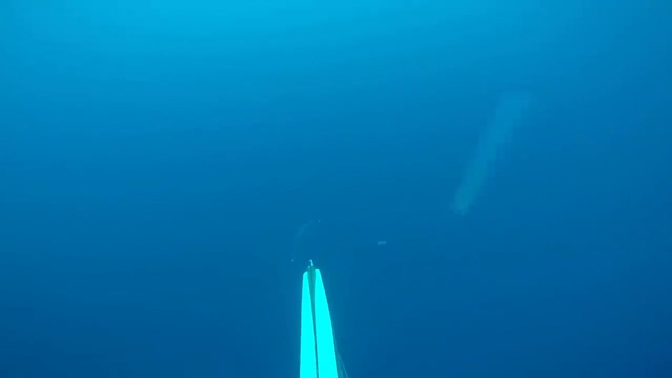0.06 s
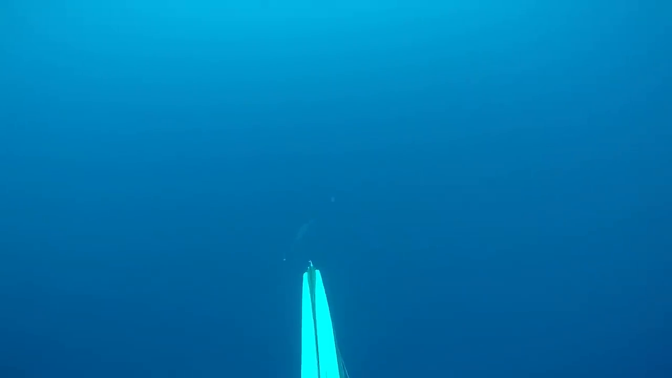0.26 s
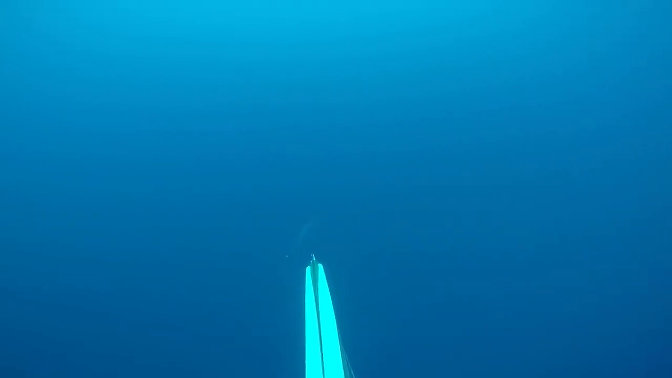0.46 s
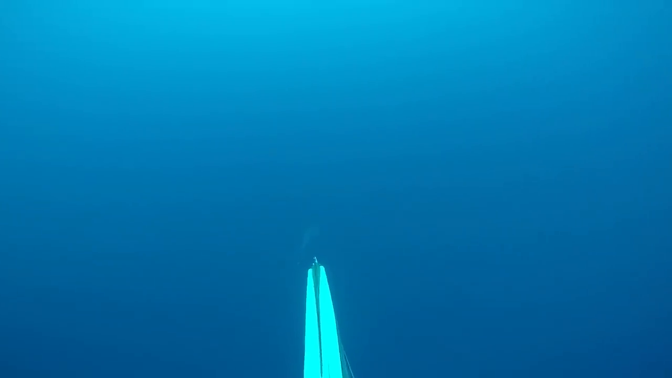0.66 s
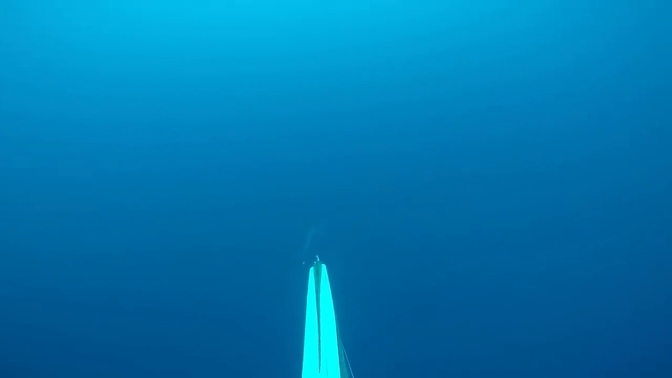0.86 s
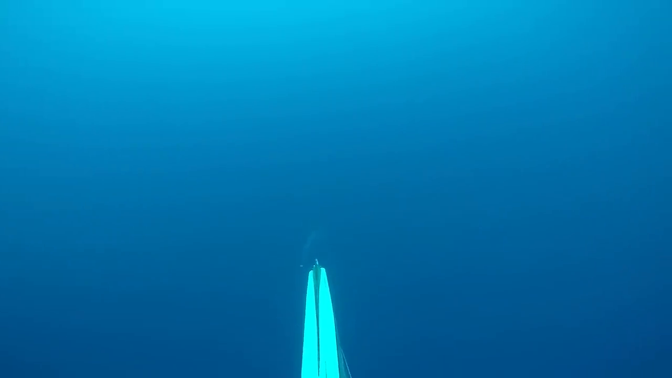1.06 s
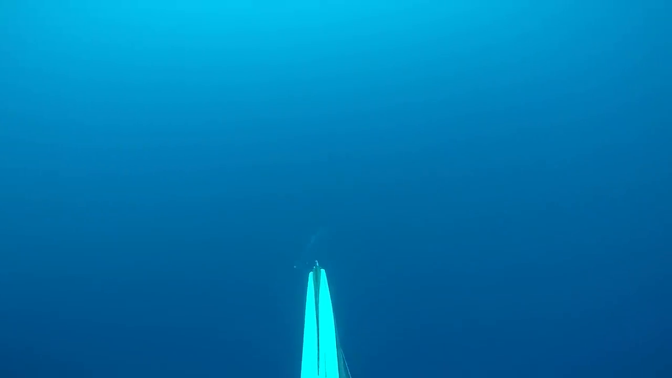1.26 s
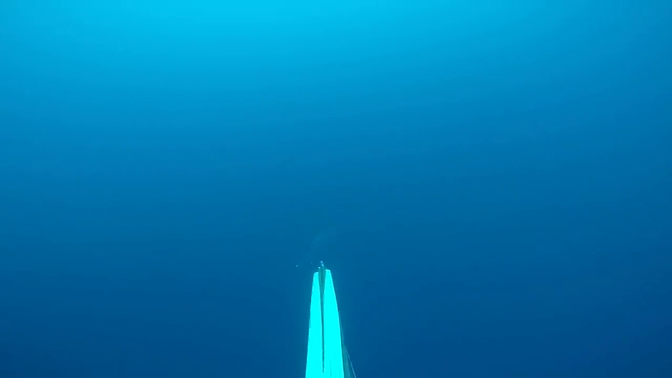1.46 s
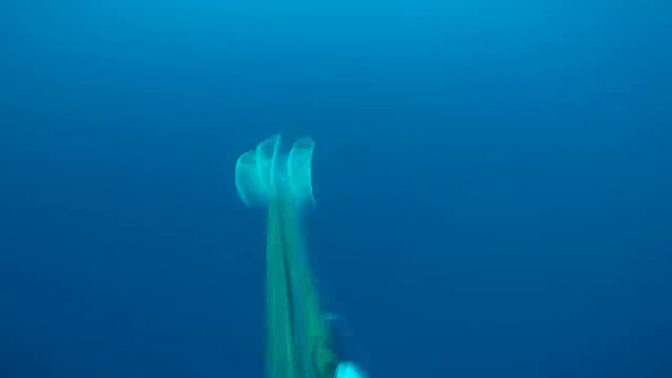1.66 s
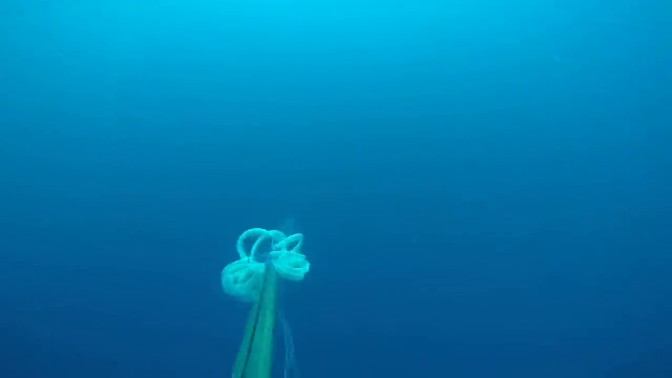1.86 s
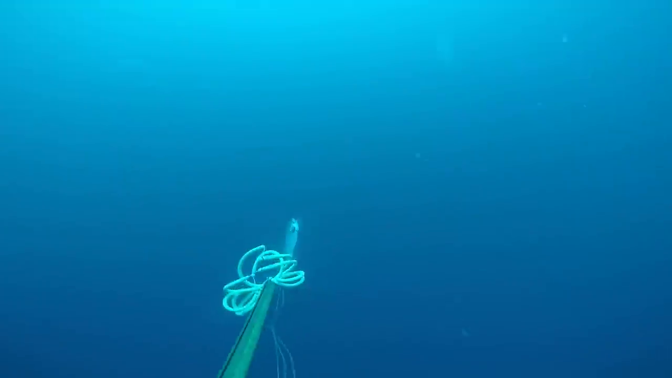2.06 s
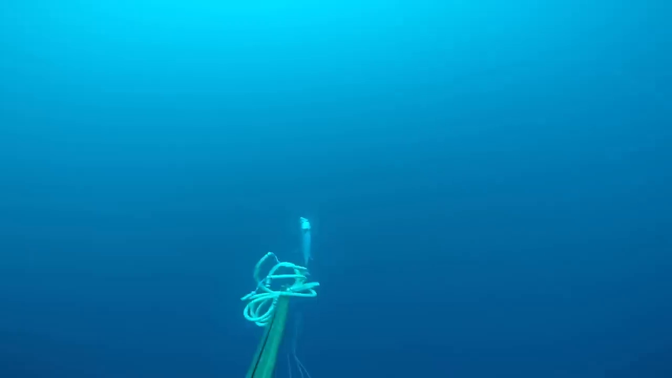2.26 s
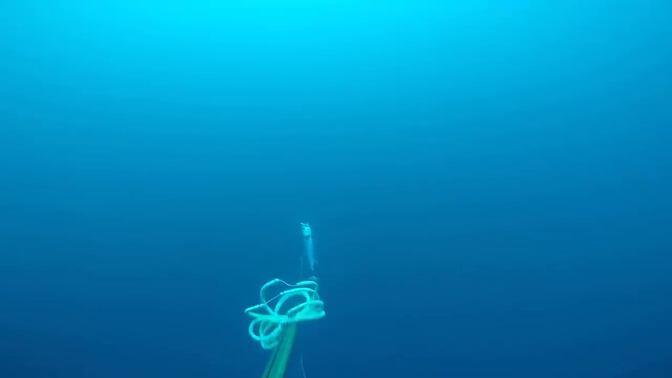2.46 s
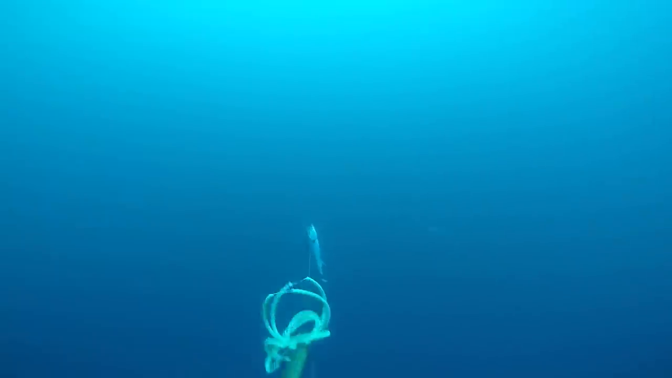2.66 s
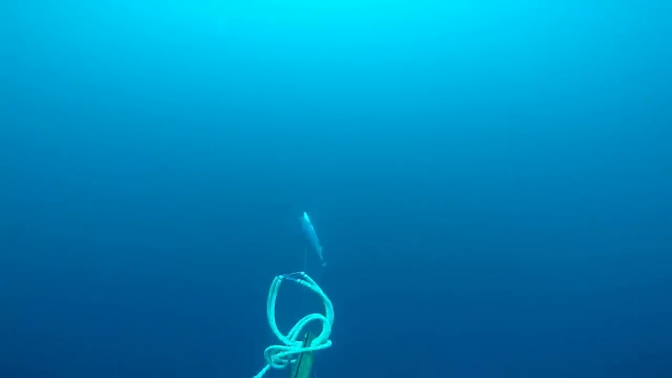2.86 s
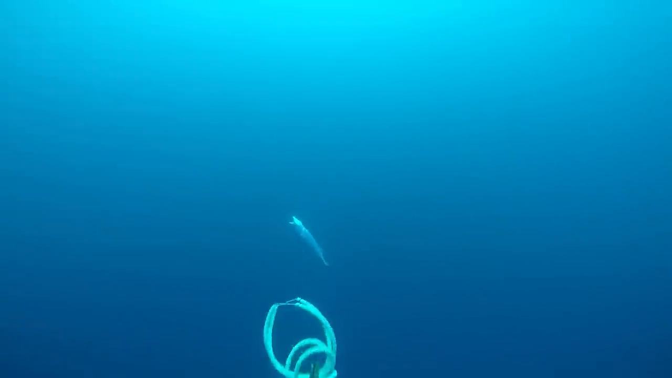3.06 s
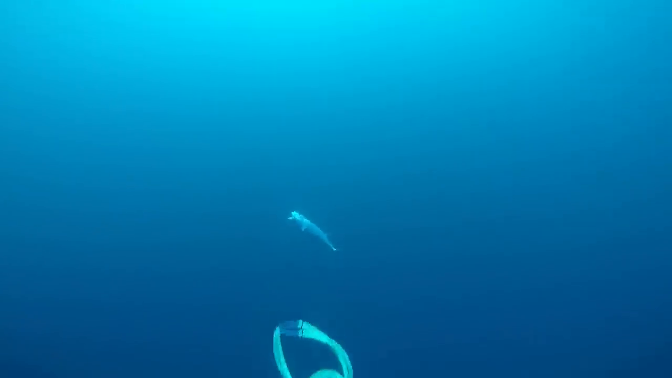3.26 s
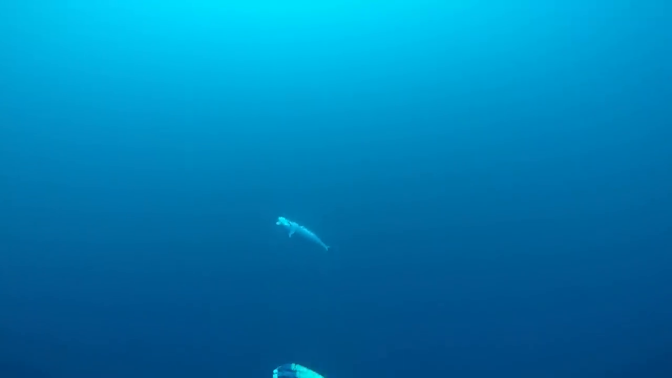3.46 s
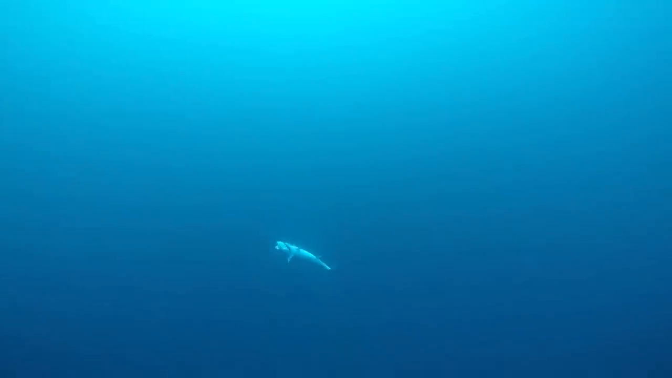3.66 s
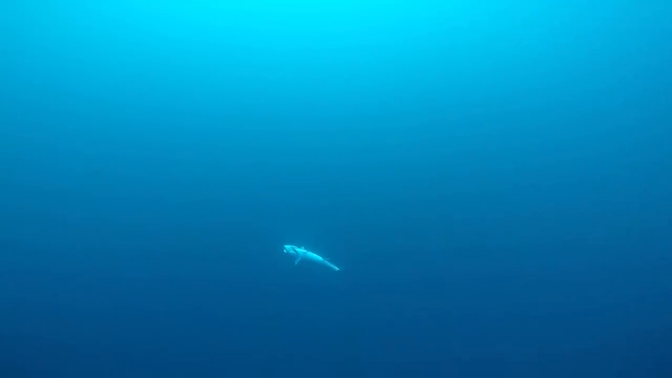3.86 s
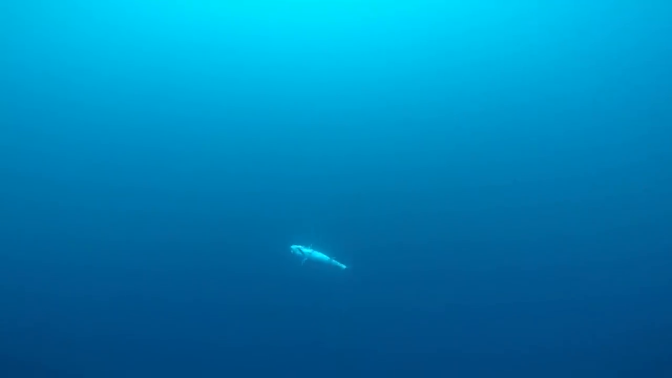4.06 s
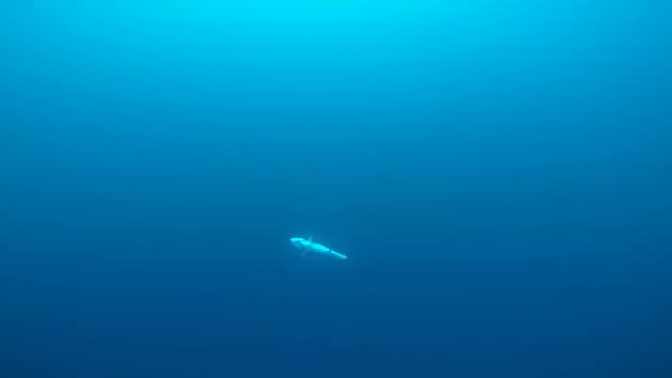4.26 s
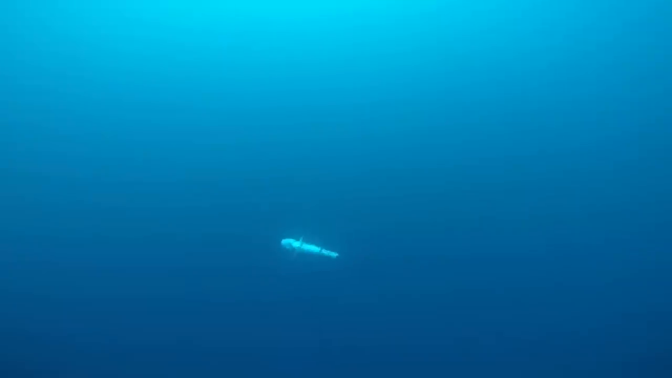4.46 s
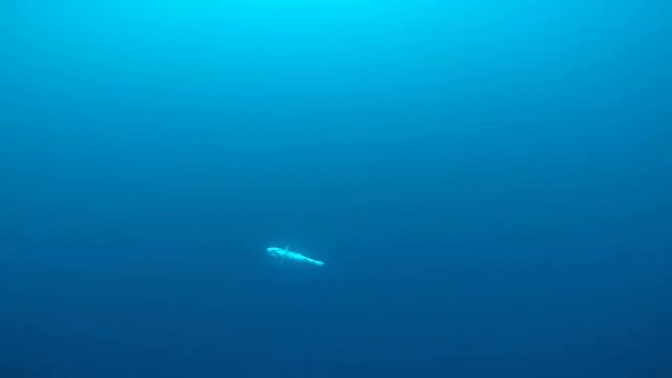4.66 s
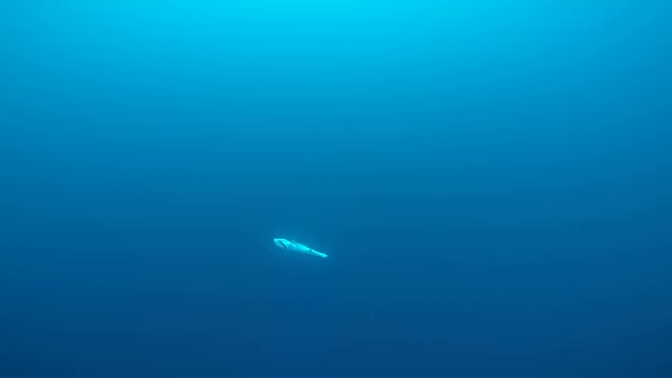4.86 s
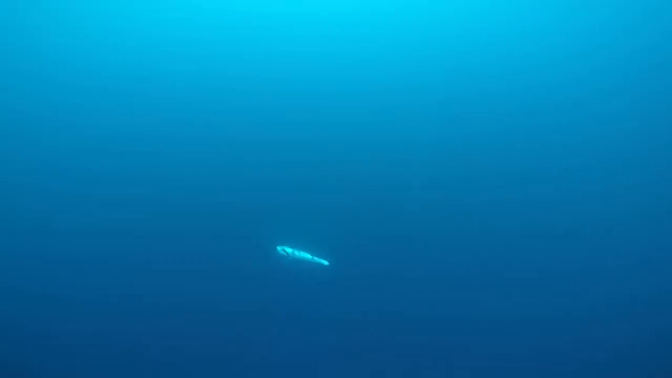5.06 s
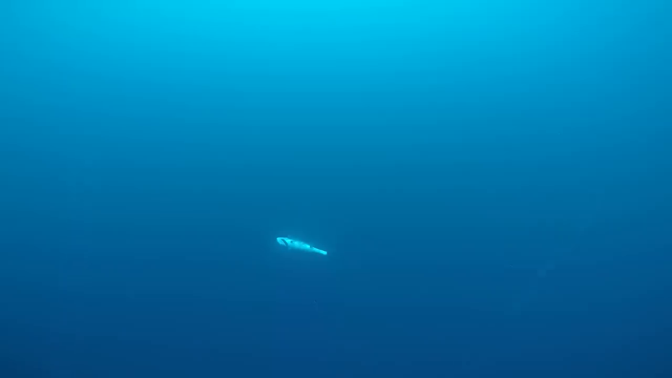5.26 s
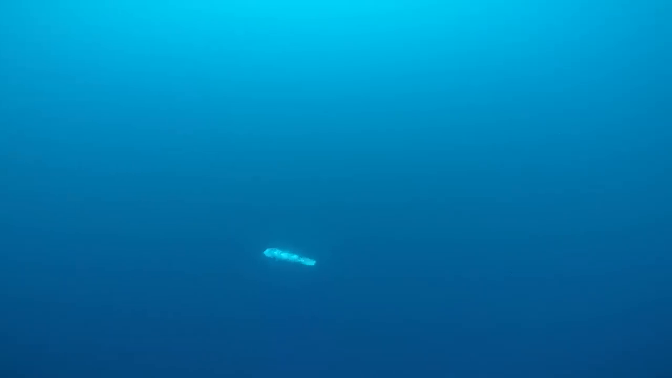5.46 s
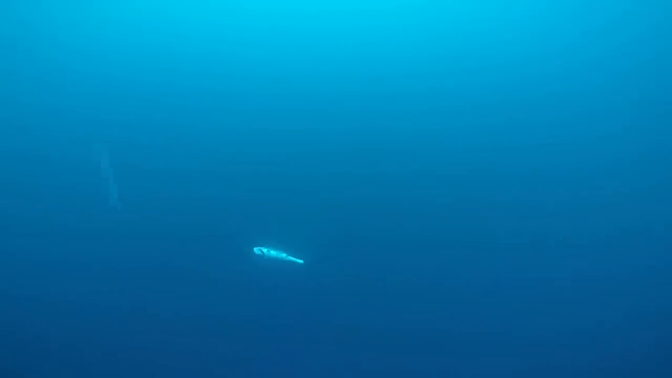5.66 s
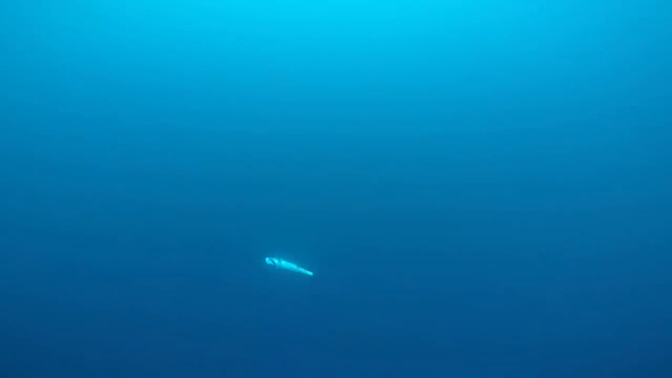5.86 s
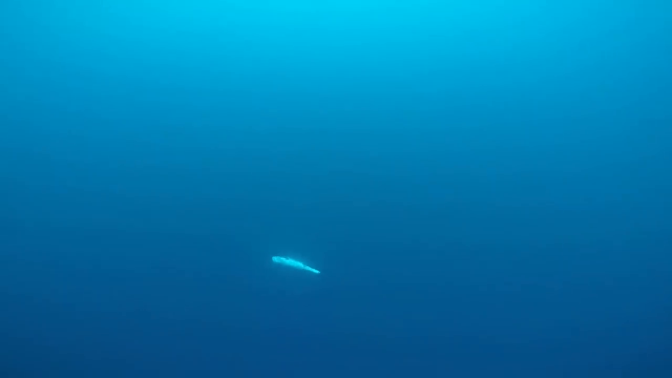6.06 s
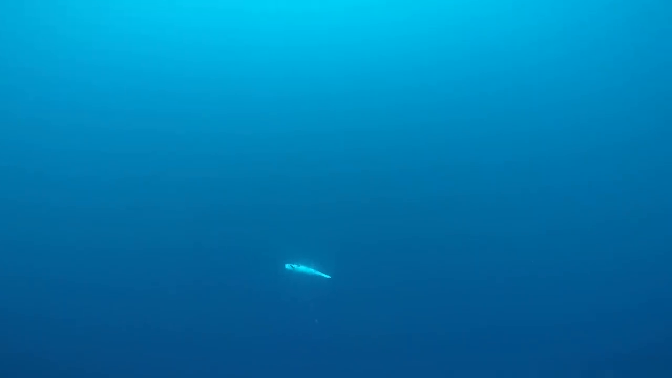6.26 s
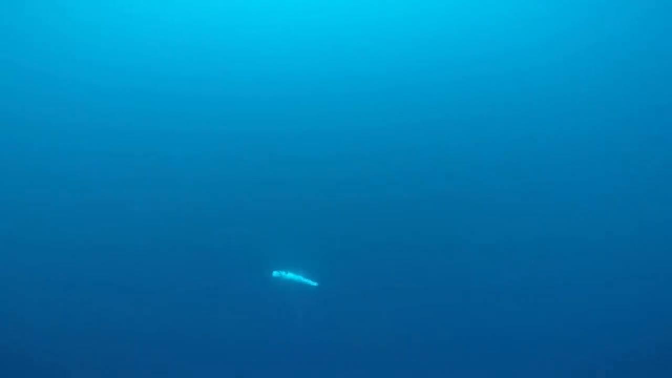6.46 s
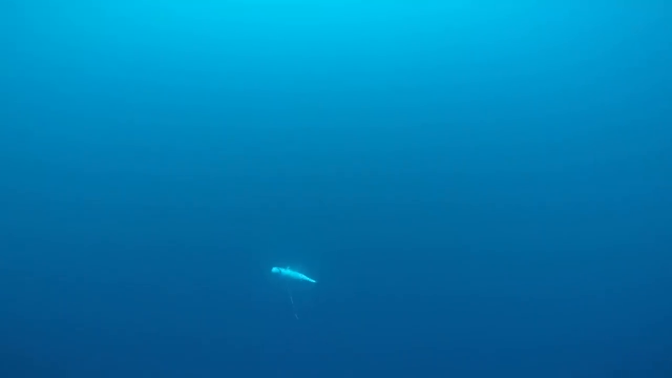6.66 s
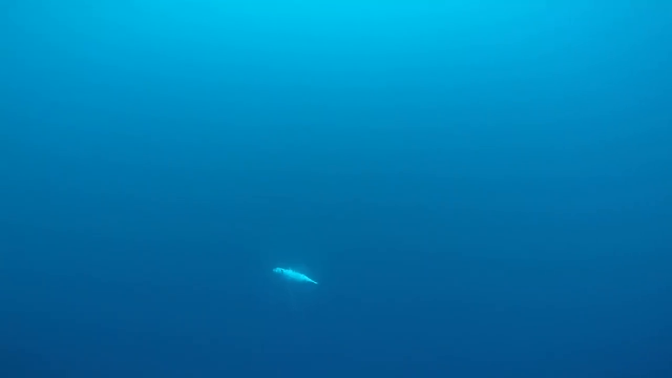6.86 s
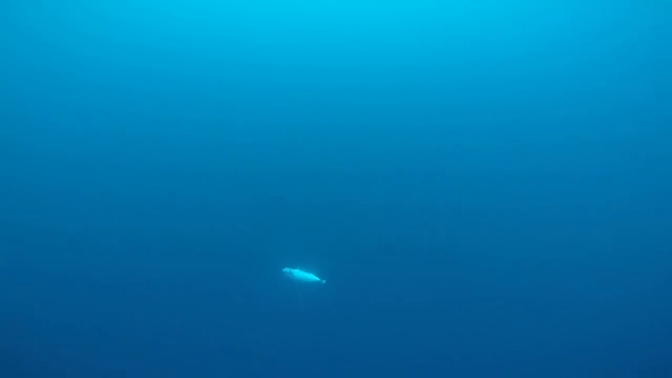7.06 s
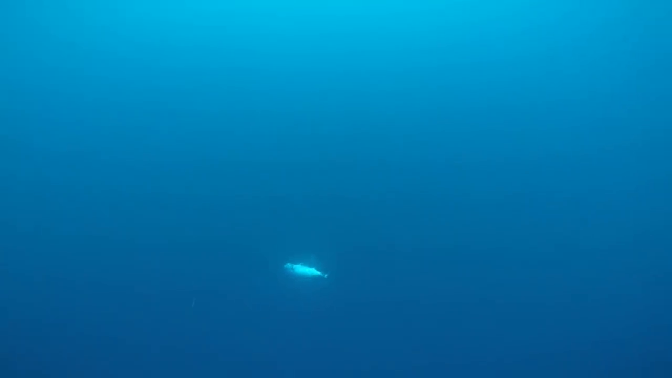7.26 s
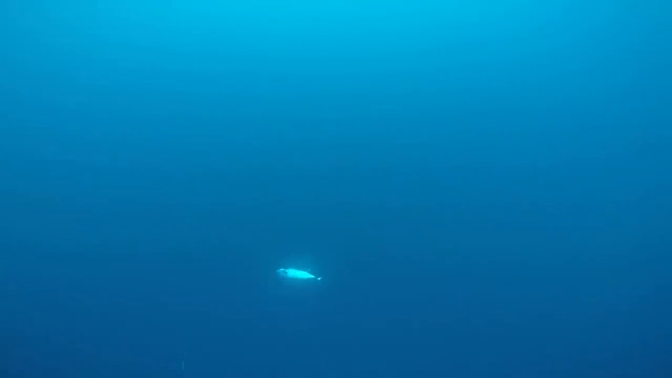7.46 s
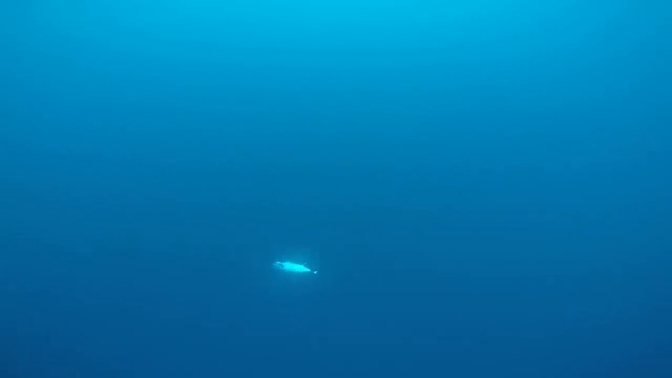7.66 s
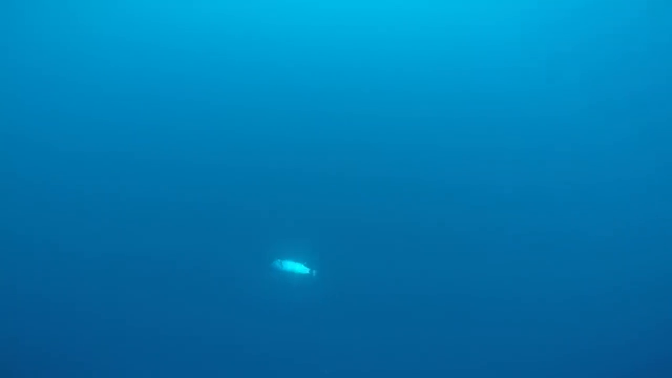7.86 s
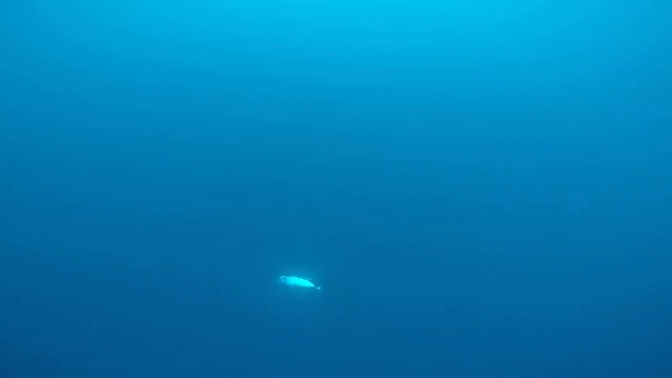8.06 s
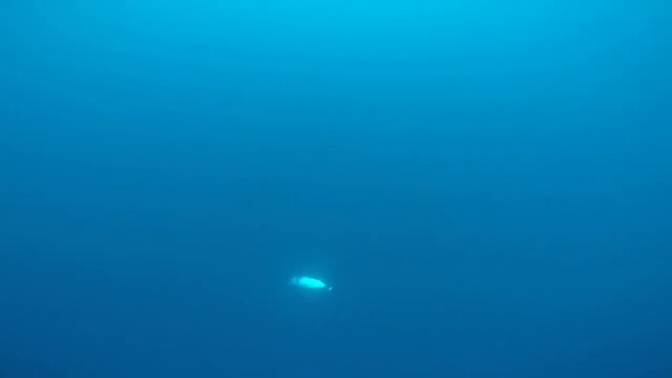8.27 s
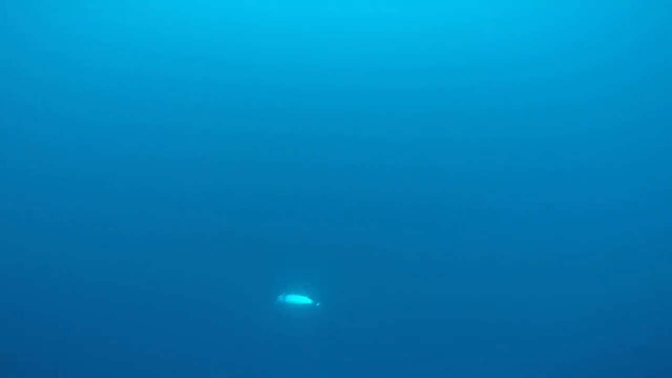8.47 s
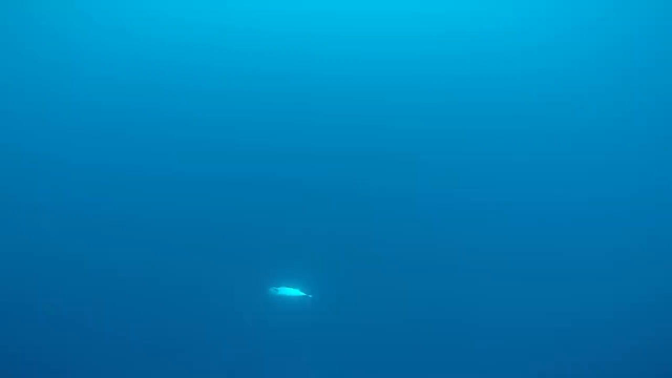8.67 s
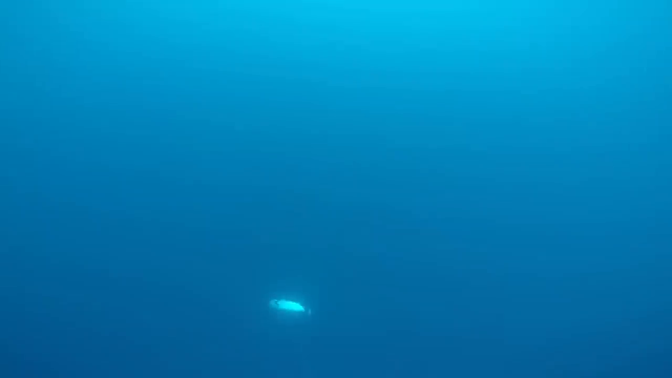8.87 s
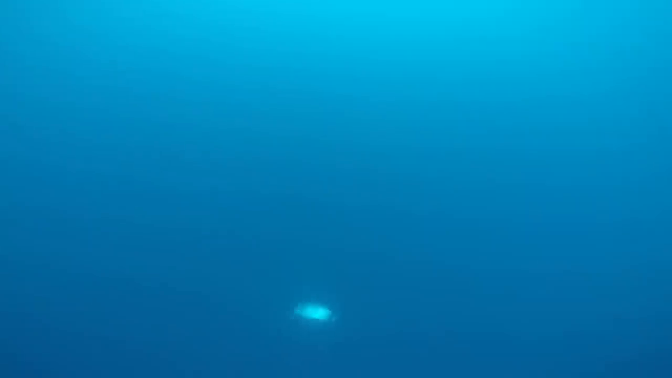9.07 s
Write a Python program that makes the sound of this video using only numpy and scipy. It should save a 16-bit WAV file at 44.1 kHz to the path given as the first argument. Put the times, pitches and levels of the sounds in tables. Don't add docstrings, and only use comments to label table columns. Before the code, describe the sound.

Open water heard through a small enclosed microphone: muffled, boxy, with fine distant shrimp crackle. Rubber and line bump the barrel before a single very loud speargun shot, all crack, clatter and low thump. Sound drops away for a moment and recovers. Afterwards come hollow knocks, bright single clicks, a scraping rub with thin rubber squeaks, throbbing low swells and a last cluster of knocks near the end.

```python
import sys
import numpy as np
from scipy import signal
from scipy.fft import rfft, irfft
from scipy.io import wavfile
from scipy.ndimage import uniform_filter1d

SR = 44100
rng = np.random.default_rng(int(sys.argv[2]) if len(sys.argv) > 2 else 0)


def generate_wav(sig):
    pcm = np.round(np.clip(np.atleast_2d(sig).T, -1, 1) * 32767).astype(np.int16)
    wavfile.write(sys.argv[1], SR, pcm)


def invert_db(level):
    return 10 ** (np.asarray(level, dtype=float) / 20)


N = 402191
TIME = np.arange(N) / SR
SLOW = TIME[::64]


def unit(x):
    return x / np.sqrt(np.mean(x ** 2))


def noise():
    return rng.standard_normal(N)


def band(x, hz, width):
    return signal.lfilter(*signal.iirpeak(hz, hz / width, fs=SR), x)


def steep(x, peaks):
    out = 0
    for k, (hz, width, db) in enumerate(peaks):
        once = band(x, hz, 1.44 * width)
        out = out + (-1) ** k * invert_db(db) * band(once, hz, 1.44 * width)
    return out


def low_pass(x, hz):
    return signal.sosfilt(signal.butter(6, hz, fs=SR, output="sos"), x)


def colour(x, points):
    hz, db = np.transpose(points)
    bins = np.maximum(np.fft.rfftfreq(N, 1 / SR), 1)
    return irfft(rfft(x) * invert_db(np.interp(np.log(bins), np.log(hz), db)), N)


def walk(rate):
    k = int(SR / rate)
    steps = np.repeat(rng.standard_normal(N // k + 1), k)
    return unit(uniform_filter1d(uniform_filter1d(steps, k), k)[:N])


def clicks(rate, spread_db, most=8.1):
    u = rng.random((3, N))
    size_db = spread_db * np.minimum(-np.log(1 - u[2]), most)
    return (u[0] < rate / SR) * np.sign(u[1] - .5) * invert_db(size_db)


def add(out, s, x):
    i = int(s * SR)
    out[i:i + len(x)] += x[:N - i]


def fade(since_s, fade_s):
    return np.exp(-np.maximum(since_s, 0) / fade_s)


def gain_db():
    before_db, duck_db, duck_at_s, fall_s = -2, -17, 1.596, 0.035
    duck_ends_s, climb_db_per_s = 2.004, 19
    fall = before_db + (duck_db - before_db) * (1 - fade(TIME - duck_at_s, fall_s))
    return np.minimum(fall + climb_db_per_s * np.maximum(TIME - duck_ends_s, 0), 0)


def crackle(rate):
    snap = clicks(rate, spread_db=8.0, most=2.8)
    tail = signal.lfilter([1], [1, -np.exp(-1 / (0.0016 * SR))], np.abs(snap))
    return unit(snap + 0.088 * tail * noise())


# pitch_hz, width_hz, level_db
CASE_WALLS = [(800, 260, -17), (1750, 315, -11.5), (2150, 218, -2.5), (2475, 362, -0.5), (3214, 215, -6),
              (3584, 223, 3.5), (4206, 350, -3.5), (5294, 650, -3.5), (6940, 1040, -9), (8165, 620, -7.5),
              (9970, 1300, -9.5), (12030, 1400, -19), (14500, 2160, -13.5)]
# pitch_hz, level_db
WATER_HISS = [(300, -3), (1400, -30.5), (2000, 20.5), (4000, 0.5), (9000, -13), (15800, -12.5)]


def reef(drag):
    level_db, treble_db, treble_duck_share, drag_db = -43, -5, 0.12, -17
    gain = gain_db()
    flurry = invert_db(2.0 * walk(20))
    both, dull, bright = (crackle(rate) for rate in (700, 600, 1200))
    far = .5 * noise() * invert_db(0.18 * walk(27))
    low_snaps = flurry * (0.6 * both + .5 * dull)
    low = unit(steep(low_snaps + far, CASE_WALLS[:8])) + invert_db(-20.5) * unit(colour(far, WATER_HISS))
    high_snaps = flurry ** 0.43 * (0.47 * both + 0.56 * bright)
    high = unit(steep(high_snaps + far, CASE_WALLS[8:]))
    treble = invert_db(treble_db + treble_duck_share * gain) * high
    return invert_db(level_db + gain) * (low + treble) + invert_db(drag_db) * drag * low


# start_s, level_db
CASE_JOLTS = [(.128, -46), (.356, -41), (.49, -57), (.876, -47), (1.554, -36), (1.76, -40), (3.049, -39.5),
              (3.19, -41), (3.361, -36), (3.69, -42), (3.85, -32.5), (4.06, -33), (4.3, -32.5),
              (4.869, -27), (5.02, -55), (5.35, -32), (5.5, -52), (5.8, -25), (5.97, -38), (6.23, -36.5),
              (6.5, -35.5), (6.8, -26), (7.01, -41.5), (7.45, -48), (7.83, -30.5), (8.3, -32.5), (8.6, -52),
              (8.83, -27.5), (9.1, -33)]
# start_s, half_length_s, level_db
EDDY_WAKES = [(.0, 0.07, -57), (0.59, .15, -48.5), (1.762, 0.078, -40), (3.03, 0.05, -56),
              (3.541, 0.11, -54), (4.02, 0.22, -51), (4.65, 0.07, -77.5), (5.2, 0.28, -57),
              (5.8, 0.43, -56), (7.94, 0.061, -46.5), (8.803, 0.25, -57)]


def surge():
    sway_db, rumble_db, duck_share = -40, -49.5, 0.61
    rise_db_per_s, fall_db_per_s = 129, 191
    sink_db = -5.5 * np.exp(-((TIME - 2.75) / .25) ** 2)
    duck_db = duck_share * gain_db() + sink_db
    jolts, wakes = 0, 0
    for s, db in CASE_JOLTS:
        drop_db = np.where(SLOW < s, rise_db_per_s * (s - SLOW), fall_db_per_s * (SLOW - s))
        jolts = jolts + invert_db(db - drop_db)
    for s, half, db in EDDY_WAKES:
        wakes = wakes + invert_db(db) * np.exp(-((SLOW - s) / half) ** 2)
    swing = invert_db(sway_db + duck_db) + np.interp(TIME, SLOW, jolts)
    flow = invert_db(rumble_db + duck_db + 1.4 * walk(6.8)) + np.interp(TIME, SLOW, wakes)
    sway = unit(band(band(noise(), 28.6, 19), 24.5, 30))
    throb = unit(sway / (np.sqrt(uniform_filter1d(sway ** 2, SR // 25) + 1e-3) + 1.6))
    rumble = unit(band(band(noise(), 70, 46.0), 97.0, 150) * invert_db(1.47 * walk(25)))
    eddies = unit(band(noise(), 183, 130) * invert_db(2.5 * walk(25)))
    return throb * swing + flow * (rumble + invert_db(-7.5) * eddies)


# start_s, length_s, low_ring_db, high_ring_db
RUB_STROKES = [(-.1, 0.16, -50, -72), (0.468, 0.086, -37, -43), (0.502, .2, -43, -52),
               (1.656, 0.078, -52.5, -46.5), (2.1, 0.7, -59, -67.5), (2.805, 0.28, -55, -77),
               (3.409, 1, -58, -88), (4.9, 0.18, -58, -83), (5.202, 0.32, -40.5, -77),
               (5.213, 0.72, -36.5, -38), (5.797, 0.34, -56, -75), (5.986, 0.33, -53, -53.5),
               (7.007, 0.25, -53, -80), (7.795, 0.24, -65, -68), (8.46, 0.21, -53, -60),
               (8.659, 0.13, -45.5, -51.5), (8.805, 0.14, -40, -38), (8.866, 0.17, -48, -48.5),
               (9.0, 0.18, -66, -65)]


def sliding():
    low_by_speed, high_by_speed = 0.59, 1.3
    creep_low_db, creep_high_db = -72.5, -65
    duck_db, low, high = 0.64 * gain_db(), 0, 0
    for s, length, low_db, high_db in RUB_STROKES:
        arch = np.abs(np.sin(np.pi * np.clip((SLOW - s) / length, 0, 1)))
        speed = arch * (SLOW < s + length)
        low = low + invert_db(low_db) * speed ** low_by_speed
        high = high + invert_db(high_db) * speed ** high_by_speed
    creep_low = invert_db(creep_low_db + duck_db + 1.5 * walk(4))
    creep_high = invert_db(creep_high_db + duck_db + 1.5 * walk(1.6))
    return np.interp(TIME, SLOW, low) + creep_low, np.interp(TIME, SLOW, high) + creep_high


# pitch_hz, width_hz, level_db
RUBBED_LOW = [(205, 60, -9), (268, 50, 0), (385, 100, -13), (560, 200, -20)]
# pitch_hz, width_hz, level_db
RUBBED_HIGH = [(770, 70, 0), (900, 90, -11), (1130, 280, -12)]


def slip_grains():
    return unit(clicks(700, spread_db=2.0)) * invert_db(2.6 * walk(50)) + .7 * noise()


def rub(low, high):
    slow, fast = slip_grains(), slip_grains()
    low_rub = unit(steep(slow, RUBBED_LOW)) * low
    return low_rub + unit(steep(fast + 0.19 * slow, RUBBED_HIGH)) * high


def taut_bands():
    hz = 840 * (1 + .035 * walk(5) + .02 * walk(60))
    hum = np.sin(2 * np.pi * np.cumsum(hz) / SR)
    return hum * invert_db(-60 + 4.5 * walk(7)) * (TIME < 1.6)


# start_s, pitch_hz, peak_db, t60_s
BLOW_RINGS = [(.461, 800, -19.5, 0.096), (.462, 435, -26, .06), (.474, 668, -14, 0.048),
              (.473, 368, -16, 0.052), (.482, 292, -23, 0.053), (.49, 256, -26.5, 0.24),
              (.497, 800, -39, .1), (1.68, 95, -26, .15), (1.6245, 302, -1, 0.035), (1.625, 470, -8, .04),
              (1.675, 800, -44, 0.13), (1.672, 233.7, -19.5, 0.068), (1.712, 190, -18.5, 0.044),
              (1.7955, 135, -23, .14), (1.8172, 133, -25, .1), (1.6243, 190, -8, .07),
              (1.776, 100, -30, .1), (1.79, 270, -29, .06), (1.82, 285, -32.5, 0.062),
              (3.441, 252, -23, 0.054), (3.447, 700, -35, 0.066), (3.6185, 81.5, -13.5, .13),
              (3.625, 150, -22, 0.11), (3.62, 319, -15, 0.08), (3.62, 423, -17, .07), (3.62, 715, -26, .06),
              (3.62, 960, -23, .07), (3.97, 255, -8, 0.11), (3.969, 139.4, -21, 0.35),
              (3.972, 386, -17, 0.09), (3.995, 401, -26, 0.11), (3.973, 530, -16.5, 0.11),
              (3.974, 723, -14, 0.092), (3.971, 905, -25, .07), (3.99, 640, -21, 0.095),
              (4.013, 218.4, -14.5, .14), (4.015, 515, -26, .1), (8.936, 433, -9, 0.091),
              (8.936, 717, -12.5, 0.077), (8.937, 293, -15, 0.16), (8.945, 205, -12.5, 0.17),
              (8.94, 95.5, -24, 0.24), (8.358, 150, -22.5, 0.045), (8.936, 549, -18, 0.074),
              (8.937, 870, -27, .05), (8.95, 402, -21, 0.065), (8.964, 420, -23.5, 0.087),
              (8.977, 226, -23, .08)]
# start_s, pitch_hz, peak_db, t60_s
LIGHT_TAP_RINGS = [(.044, 403, -37, .04), (.055, 730, -37.5, 0.034), (.11, 800, -25.5, 0.037),
                   (.61, 834, -32.5, 0.047), (2.857, 850, -42.5, .05), (2.897, 270, -39, .05),
                   (2.972, 430, -33, 0.058), (2.985, 674, -34, 0.041), (3.012, 500, -33, 0.046),
                   (3.124, 500, -45, 0.03), (3.268, 900, -41, 0.052), (3.505, 395, -30, .05),
                   (3.508, 695, -36, 0.056), (3.508, 1290, -41, .04), (4.628, 305, -26, .04),
                   (4.632, 664, -25, 0.047), (4.647, 390, -36, 0.047), (4.772, 433, -29, .08),
                   (4.78, 400, -28, 0.035), (4.779, 814, -34, .05), (4.817, 775, -37, .04),
                   (4.845, 850, -38, .04), (4.866, 600, -37, 0.033), (4.976, 420, -43, .09),
                   (5.0, 445, -40, .07), (5.014, 424, -37, 0.092), (5.033, 750, -40, .04),
                   (5.114, 280, -29, .04), (5.118, 715, -30.5, 0.042), (6.065, 780, -30.5, 0.057),
                   (6.09, 760, -37, .06), (6.115, 800, -35, 0.05), (6.14, 754, -38, 0.05),
                   (6.19, 750, -47, .08), (8.71, 300, -38, .1), (8.925, 1200, -41, 0.036),
                   (8.995, 1100, -39, .04),
                   (1.565, 420, -42, .04), (1.565, 720, -44, .04), (2.14, 990, -44, .06),
               (3.268, 1100, -44, .06), (3.32, 450, -43, .05), (3.842, 290, -35, .08), (3.9, 270, -39, .06),
               (3.945, 330, -37, .06), (3.945, 720, -41, .05), (5.985, 770, -41, .05),
               (6.015, 760, -43, .05), (6.038, 790, -37, .06), (6.235, 1600, -44, .04),
               (7.051, 400, -42, .05), (7.104, 215, -36, .1), (7.274, 780, -43, .05),
               (7.312, 385, -39, .06), (7.314, 760, -45, .04), (8.186, 786, -28, .05), (8.19, 215, -31, .2),
               (8.31, 400, -37, .06), (8.358, 420, -33, .05), (8.83, 1150, -38, .05)]
# start_s, pitch_hz, peak_db, t60_s
SHAFT_RINGS = [(1.6475, 673, -11, .3), (1.6475, 781, -8, .3), (1.6465, 870, -17, .15),
               (1.6445, 2400, -17, .12), (1.6445, 2331, -12.5, .2), (1.6445, 2492, -10.5, 0.22),
               (1.6445, 3190, -20, 0.089), (1.635, 3575, -18, .15), (1.649, 3610, -12, 0.087),
               (1.65, 4390, -17, 0.076), (1.647, 485, -18, 0.11)]


def ring_out(rows):
    attack_s, sag, sag_s = 0.0015, 0.032, .015
    out, t = np.zeros(N), np.arange(SR // 3) / SR
    for s, hz, db, t60 in rows:
        turns = hz * (t + sag * (hz < 500) * sag_s * (1 - np.exp(-t / sag_s)))
        strength = invert_db(db - 60 * t / t60) * (1 - np.exp(-t / attack_s))
        add(out, s, -strength * np.sin(2 * np.pi * turns))
    return out


def rings():
    heavy = low_pass(ring_out(BLOW_RINGS), 1000)
    light = ring_out(LIGHT_TAP_RINGS)
    railed = ring_out(SHAFT_RINGS) * fade(TIME - 1.6605, 0.0025)
    return (heavy + light + railed) * invert_db(2 * walk(70))


# start_s, peak_db, low_ring_hz, upper_rings_db, t60_s
HEAVY_BLOWS = [(1.625, -22, 110, -10, 0.1), (1.627, -20.5, 258, -6, 0.056), (1.647, -16.5, 325, 1.5, 0.068),
               (1.735, -39, 195, -4, 0.07), (1.78, -35, 135, -23, 0.12), (1.79, -41, 256, -25, 0.07),
               (.463, -26, 392, 5.5, 0.065), (.468, -25, 400, 9, 0.049), (.476, -20.5, 351, 3.5, 0.053),
               (3.44, -26.5, 195, -18, 0.11), (3.502, -21, 94.5, -9.5, 0.045), (3.635, -24, 212, -15, 0.16),
               (3.621, -24, 86, -4, 0.091), (3.972, -18, 220.4, -4, 0.17), (4.035, -35, 191, -13, 0.1),
               (4.083, -32.5, 294, -23, 0.082), (8.357, -25, 125, -24, 0.045), (8.938, -19, 217, -9, 0.086),
               (8.95, -17.5, 300, -4.5, 0.08)]
# start_s, peak_db, low_ring_hz, upper_rings_db
LIGHT_KNOCKS = [(0.045, -39, 390, 6), (.111, -47, 455, 14), (.607, -35, 188, -32), (0.662, -38, 280, -21),
                (2.142, -54, 414, 4.5), (2.869, -47, 176, -4.5), (2.97, -36, 144, -3),
                (3.007, -37.5, 129, 3), (3.287, -55, 305, 6), (3.399, -37, 250, -15),
                (3.841, -41.5, 298, -3), (4.629, -27, 368, -4), (4.775, -30, 400, -10),
                (4.845, -37, 145, 4), (4.979, -46, 136, -8.5), (5.115, -31, 240, -4.5),
                (6.063, -40, 380, -3), (8.129, -42, 398, -1), (4.298, -41, 306, -1.5),
                (6.277, -35.5, 410, -9), (6.424, -34.5, 400, -18), (7.681, -37.5, 208, -0.5),
                (7.94, -29, 410, -27), (7.958, -32, 370, -21), (8.172, -24.5, 226.8, -24),
                (8.186, -34.5, 425, 6.5), (8.307, -34.5, 127, -2), (8.675, -42, 153, 8)]
# multiple_of_low_ring, level_db, share_of_t60
LOW_MODES = [(.35, -6, 0.44), (.63, -6.5, 0.71), (1.001, 2.5, 1.5), (1.2, -5, .7), (1.4, -3, 0.49),
             (1.75, -5.5, 0.52), (2, -3, 0.5), (2.5, -18, 0.53)]
# pitch_hz, level_db, share_of_t60
HIGH_MODES = [(514, 1, 0.26), (682, -7.5, 0.22), (642, -7, 1), (721, 3.5, 0.45), (737, -7.5, 0.74),
              (838, -5.5, 0.38), (1080, -21.5, 0.9), (1274, -4.5, 0.058), (1500, -11.5, 0.39)]


def struck(modes, push, r, t60, t):
    even_push = .8
    body = 0
    for k, (hz, db, share) in enumerate(modes):
        heard_hz = hz * (1 + 0.018 * r[-k])
        taken = np.abs(push @ np.exp(2j * np.pi * heard_hz * t[:3000])) ** even_push
        tone = np.sin(2 * np.pi * hz * (1 + 0.035 * r[-k]) * t + 3 * r[-k - 20])
        body = body + invert_db(db) / taken * tone * invert_db(-60 * t / (share * np.clip(t60, .02, .3)))
    sound = signal.fftconvolve(body, push)
    return sound / np.abs(sound).max()


def knocks():
    cycles, least_t60_s, contact_s = 7.7, 0.029, .0024
    out, t = 1e-9 * noise(), np.arange(SR // 4) / SR
    light = [(*row, least_t60_s + cycles / row[2]) for row in LIGHT_KNOCKS]
    u = t[:3000] / contact_s
    for s, db, hz, upper_db, t60 in [*HEAVY_BLOWS, *light]:
        r = rng.standard_normal(3000)
        push = r * u * np.exp(-u)
        low = struck([(m * hz, d, q) for m, d, q in LOW_MODES], push, r, t60, t)
        high = struck(HIGH_MODES, push, r, t60, t)
        top_hz = 930 * invert_db(np.clip(upper_db + 4, 0, 6) * .8)
        add(out, s - .002, invert_db(db) * low_pass(1.39 * low + invert_db(upper_db) * high, top_hz))
    return out


def snaps(rows):
    tones, edges, t = 1e-9 * noise(), 1e-9 * noise(), np.arange(600) / SR
    for s, db, hz, edge_db in rows:
        grit = rng.standard_normal(600)
        ring = np.sin(2 * np.pi * hz * t) * np.exp(-t / 0.0016)
        add(tones, s, invert_db(db - 6.5) * (ring + 0.088 * grit * np.exp(-t / 0.0004)))
        add(edges, s, invert_db(edge_db + 1.5) * grit * np.exp(-t / 0.0024))
    tones = signal.sosfilt(signal.butter(3, 1800, "high", fs=SR, output="sos"), tones)
    return tones + band(band(edges, 5900, 5000), 5300, 7400) + invert_db(-9) * band(edges, 11500, 7000)


# start_s, peak_db, pitch_hz
NEAR_SNAPS = [(0.1131, -36, 3720), (0.2019, -27, 3590), (0.4628, -23.5, 3500), (0.5227, -33, 3700),
              (1.3473, -21, 3500), (2.7443, -16, 3510), (2.7916, -23.5, 5100), (3.255, -15, 3640),
              (3.4775, -14.5, 2360), (3.554, -23, 3590), (3.6215, -18, 2280), (3.9718, -10, 2280),
              (4.424, -20, 2340), (4.633, -8.5, 2250), (5.2267, -20, 3600), (5.367, -19, 3780),
              (5.5295, -19, 2200), (5.9595, -36, 3530), (6.3758, -18.5, 3740), (6.4369, -34, 2290),
              (6.7576, -17.5, 3640), (7.1784, -16.5, 3640), (8.326, -17, 1930), (8.268, -14.5, 2420),
              (8.647, -18.5, 3650), (8.7365, -21, 3500), (8.883, -25, 3750),
              (4.4243, -25, 3610), (5.225, -27, 3670), (5.3667, -22, 3590), (7.1781, -32, 3610),
              (8.3444, -30, 3550), (8.3704, -29, 3700), (8.4053, -21, 3600), (8.5081, -22, 2180),
              (8.6048, -22, 2420), (8.6567, -25, 3580), (8.7056, -27, 2430), (8.7575, -23, 3470),
              (8.7874, -25, 3570), (8.9635, -31, 3680), (8.9895, -24, 3660)]


def near_shrimp():
    edge_db = -39
    return snaps([(*row, edge_db) for row in NEAR_SNAPS])


# start_s, pitch_hz, level_db
RUBBER_SQUEAKS = [
    [(1.33, 1500, -50), (1.35, 1955, -44), (1.362, 1920, -57), (1.372, 1850, -46), (1.385, 1750, -36),
     (1.4, 1700, -60)],
    [(5.45, 2840, -46), (5.47, 2150, -43), (5.5, 2240, -60), (5.545, 2550, -41), (5.56, 2380, -62)],
    [(5.57, 2650, -45), (5.6, 3000, -44), (5.63, 3270, -45), (5.65, 3200, -44), (5.663, 2880, -46),
     (5.668, 2800, -60)],
    [(6.03, 754, -62), (6.07, 800, -55), (6.095, 790, -55), (6.12, 850, -49), (6.14, 984, -41),
     (6.155, 1000, -64)],
]


def squeaks():
    out, flutter_db, waver = np.zeros(N), 2.6 * walk(90), 1 + 0.013 * walk(150)
    for rows in RUBBER_SQUEAKS:
        s, hz, db = np.transpose(rows)
        on = slice(int(s[0] * SR), int(s[-1] * SR))
        glide = np.interp(TIME[on], s, hz) * waver[on]
        level = invert_db(np.interp(TIME[on], s, db) + flutter_db[on])
        out[on] += level * np.sin(2 * np.pi * np.cumsum(glide) / SR)
    return out


# start_s, length_s, level_db, fade_s
SHOT_IMPACTS = [(1.6239, 0.0036, -5, 0.0015), (1.6256, 0.0022, 1, 0.00096), (1.633, 0.0069, -13, 0.0033),
                (1.642, 0.0073, -10, 0.0025), (1.645, 0.013, -11.5, 0.00148),
                (1.656, 0.0074, -16.5, 0.0014), (1.675, 0.0041, -32, 0.013), (1.708, .004, -43, 0.012),
                (1.734, 0.016, -45.5, .004), (1.784, 0.011, -37.5, 0.0057), (1.813, 0.011, -48, 0.0054)]
# pitch_hz, width_hz, level_db
GUN_RINGS = [(722, 21, -1.5), (1700, 43, -2), (2050, 47, 1.5), (2340, 70, 3), (2494, 78, 5),
             (3240, 27, -0.5), (3570, 76, 1.5), (4470, 82, -16.5), (5070, 52, -10.5), (5870, 73, -18.5),
             (6300, 220, -7), (6630, 630, -14.5)]


def shot():
    early = TIME[:2 * SR]
    strength = np.full(2 * SR, 1e-9)
    for s, length, db, fade_s in SHOT_IMPACTS:
        strength += (early > s) * invert_db(db) * fade(early - s - length, fade_s)
    grains = unit(clicks(6000, spread_db=8.0, most=2.83)) + 0.21 * noise()
    impacts = strength * grains[:2 * SR]
    rattle = invert_db(4.5) * steep(impacts, [(hz, 3.7 * width, db) for hz, width, db in GUN_RINGS])
    boom = band(impacts * (early > 1.644), 760, 145)
    return np.pad(rattle + invert_db(-40) * impacts + boom, (0, N - 2 * SR))


def lurch():
    from_hz, to_hz, slows_s = 53.6, 16.9, .024
    t = np.maximum(TIME - 1.6302, 0)
    turns = to_hz * t + (from_hz - to_hz) * slows_s * (1 - np.exp(-t / slows_s))
    kick = .74 * fade(t - .016, .0015) * np.sin(2 * np.pi * 64 * t)
    swing = .37 * np.exp(-(t / .088) ** 2) * np.sin(2 * np.pi * turns)
    return -kick - swing


# start_s, peak_db, pitch_hz, edge_db
SPEAR_AND_LINE_TICKS = [(1.7514, -41, 2150, -57), (1.7883, -17.5, 2180, -30.5), (1.8044, -24, 2200, -51),
                        (1.8194, -30, 3570, -41), (1.8274, -36, 2390, -38), (2.1041, -24, 3790, -45),
                        (2.1395, -25.5, 2494, -22.5), (4.0913, -14.5, 2400, -31), (4.439, -17, 3590, -30),
                        (6.3561, -26, 3540, -25), (6.851, -20, 3600, -27), (8.0642, -21, 3680, -26),
                        (1.6625, -20, 3600, -20),
    (4.712, -22, 2300, -38),
    (5.29, -27, 1750, -40),
]


def line_ticks():
    return snaps(SPEAR_AND_LINE_TICKS)


# start_s, level_db
AFTER_SHOT_HISS = [
    (1.7, -93),
    (2.0, -63.5),
    (2.4, -52),
    (2.47, -73),
]


def after_shot_hiss():
    s, db = np.transpose(AFTER_SHOT_HISS)
    return noise() * invert_db(np.interp(TIME, s, db))


def scene():
    low_rub, high_rub = sliding()
    water = reef(high_rub) + surge() + near_shrimp()
    rubber = rub(low_rub, high_rub) + taut_bands() + squeaks()
    blows = rings() + knocks() + shot() + lurch() + line_ticks()
    return (water + rubber + blows + after_shot_hiss())[None]


def top_cut(x):
    return signal.sosfilt(signal.butter(12, 16480, fs=SR, output="sos"), x)


def record(dry):
    dry = signal.sosfilt(signal.ellip(10, .3, 60, 15250, fs=SR, output="sos"), dry)
    mix = 0.93 * dry / (1 + np.abs(dry) ** 5) ** (1 / 5)
    return top_cut(mix)


dry = scene()
out = record(dry)
generate_wav(out)
```